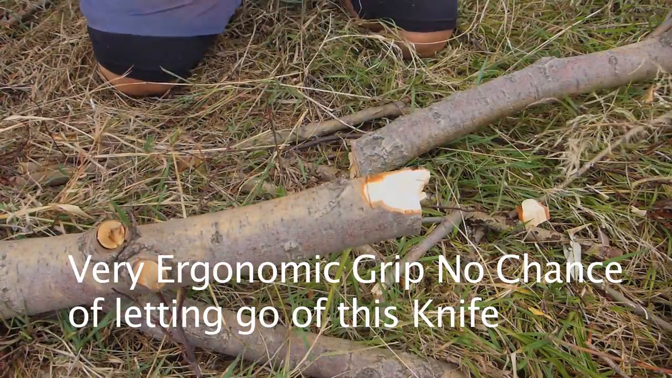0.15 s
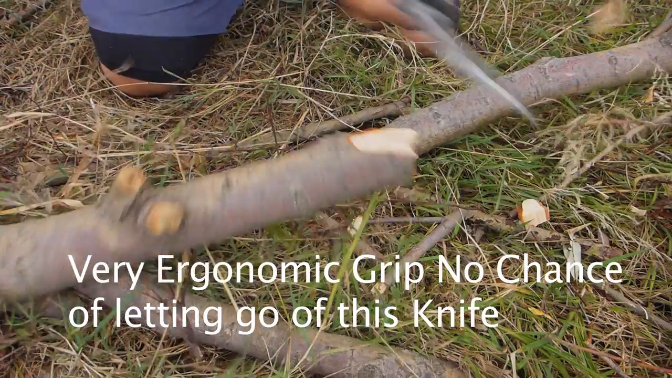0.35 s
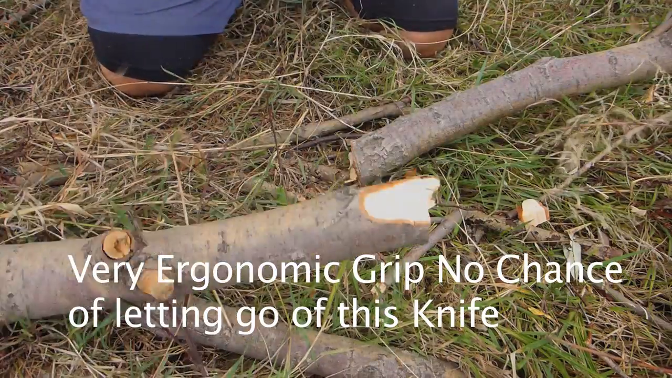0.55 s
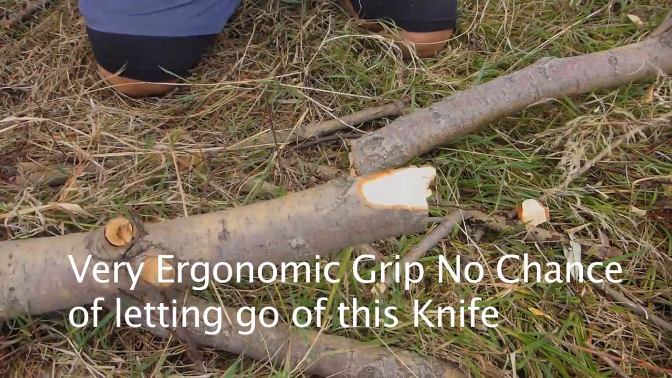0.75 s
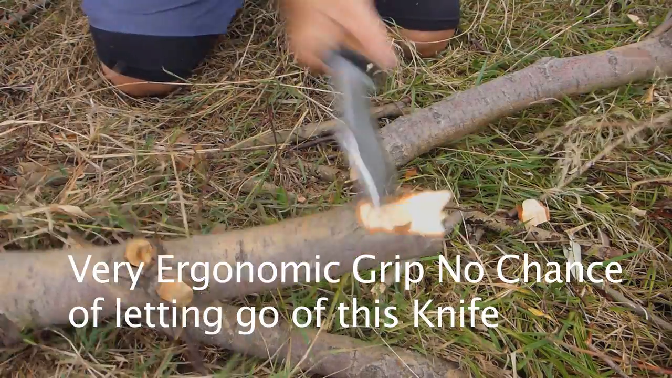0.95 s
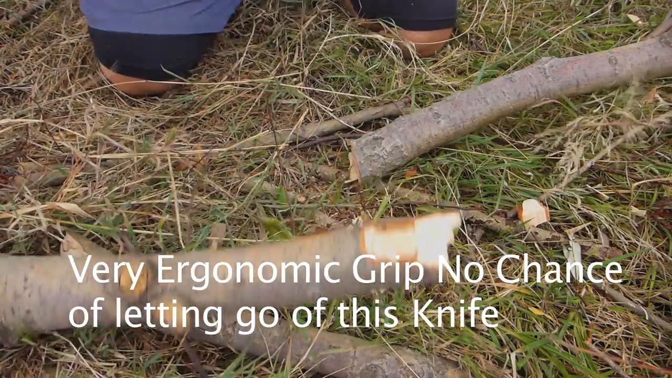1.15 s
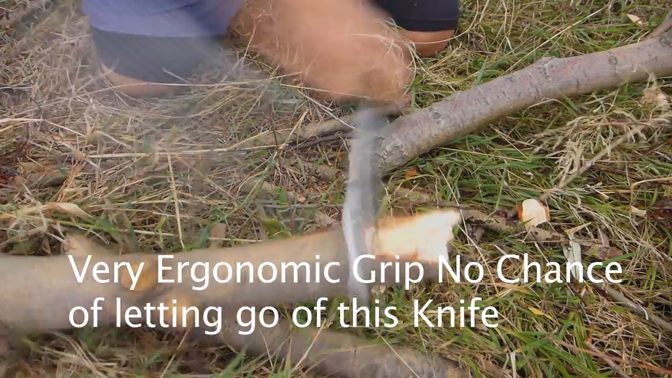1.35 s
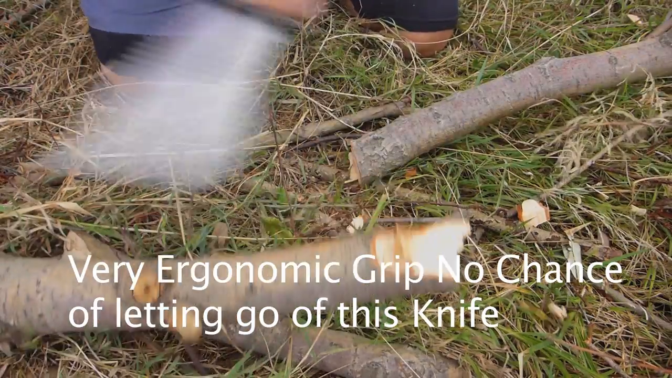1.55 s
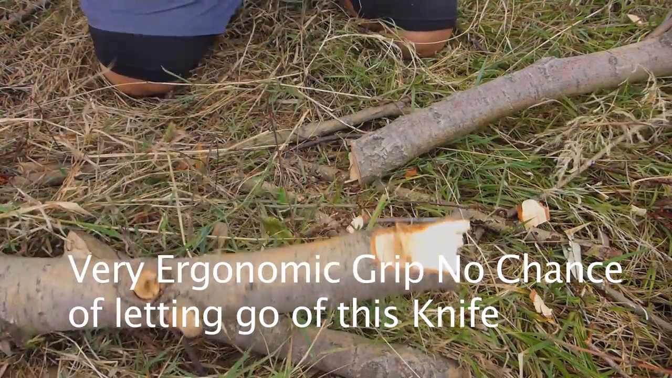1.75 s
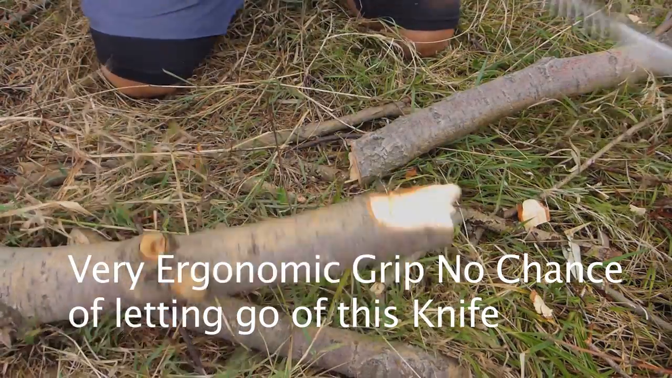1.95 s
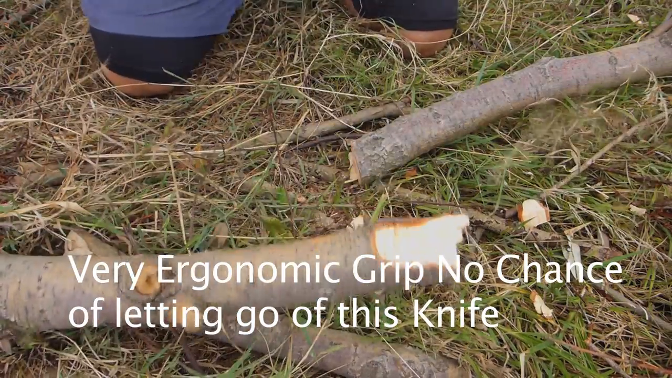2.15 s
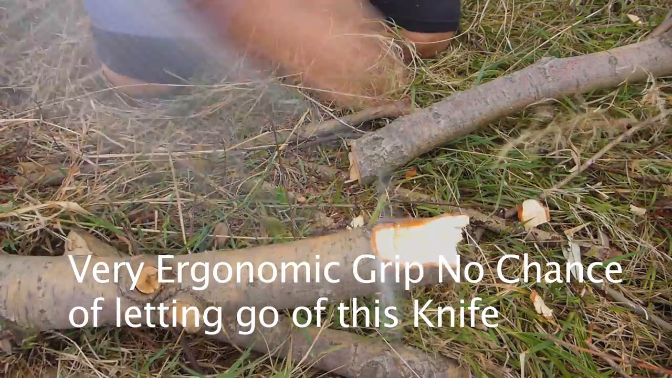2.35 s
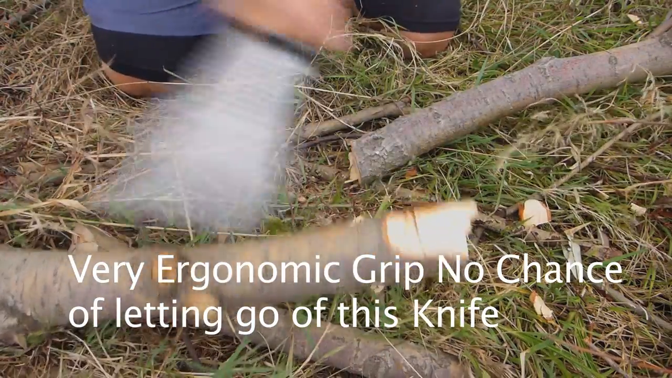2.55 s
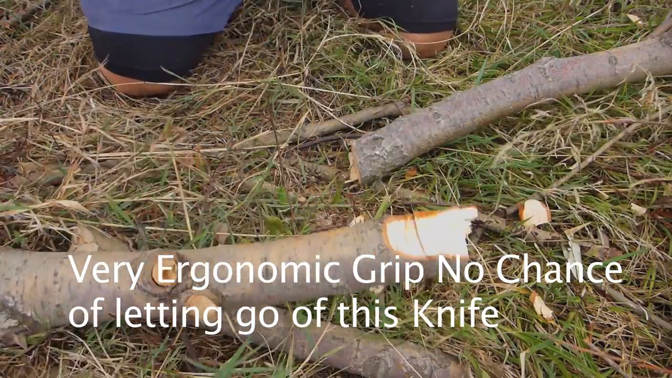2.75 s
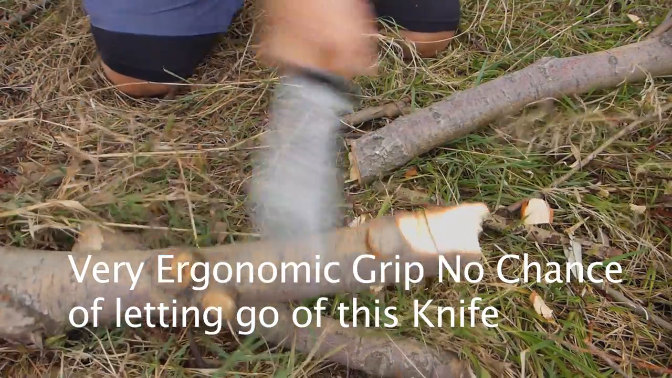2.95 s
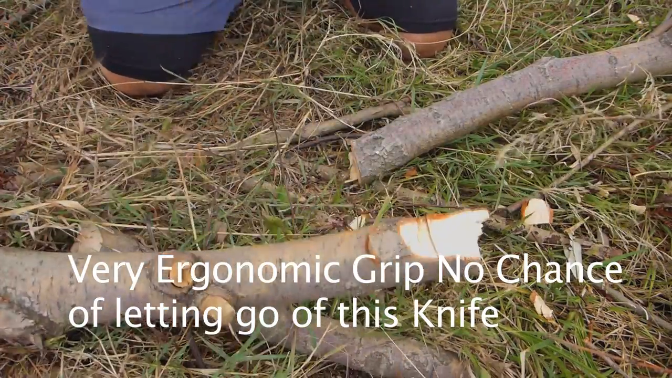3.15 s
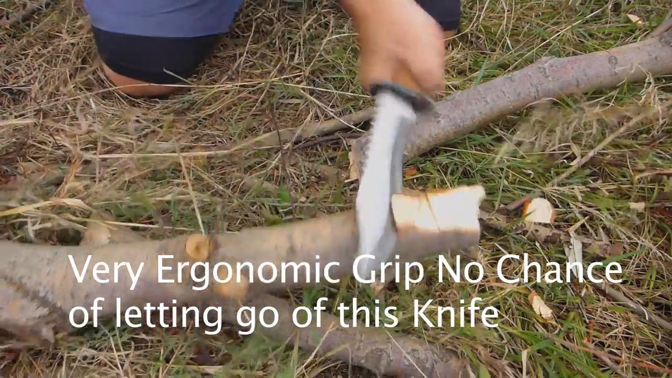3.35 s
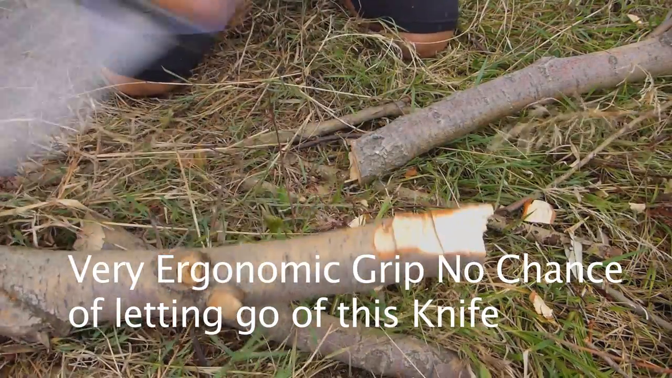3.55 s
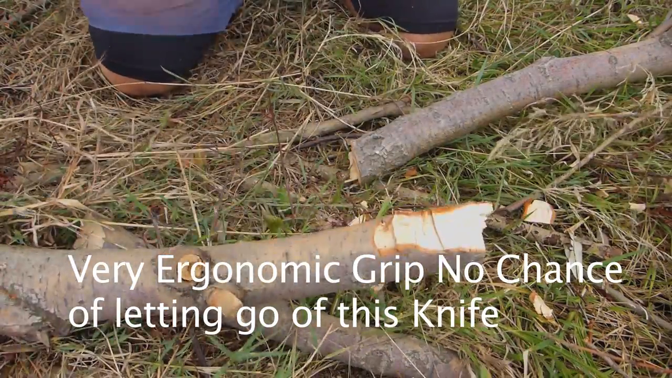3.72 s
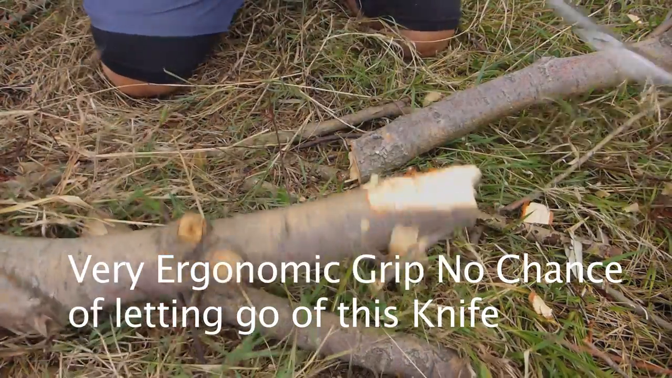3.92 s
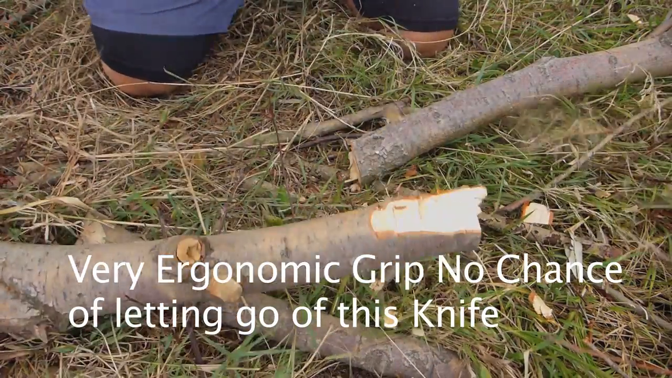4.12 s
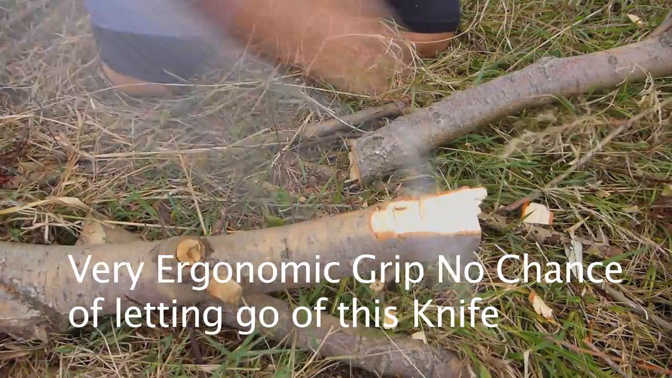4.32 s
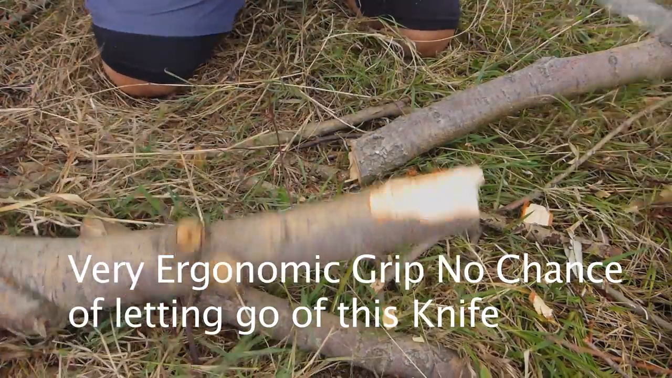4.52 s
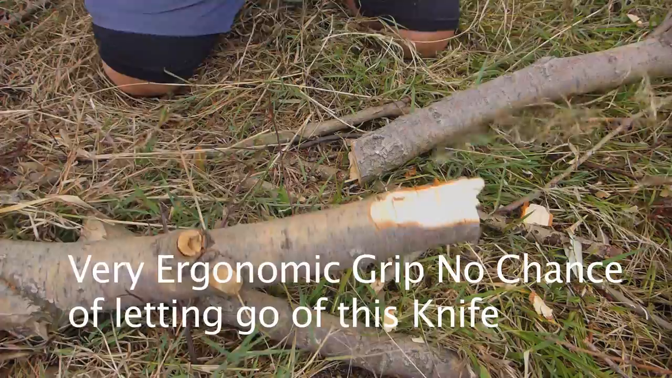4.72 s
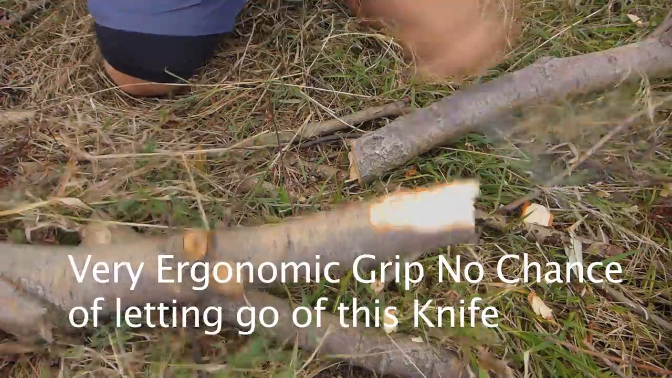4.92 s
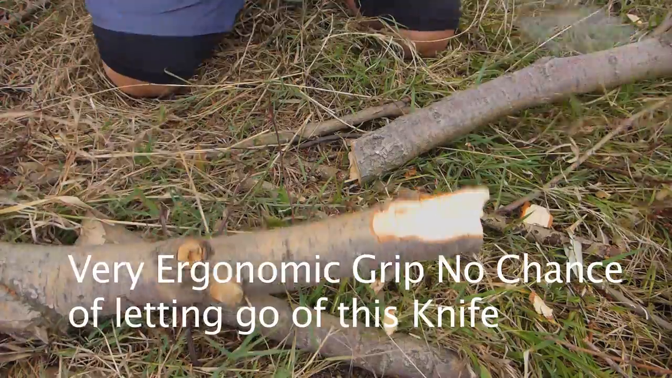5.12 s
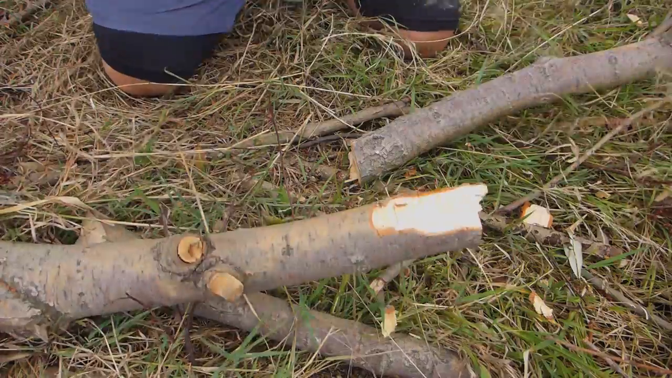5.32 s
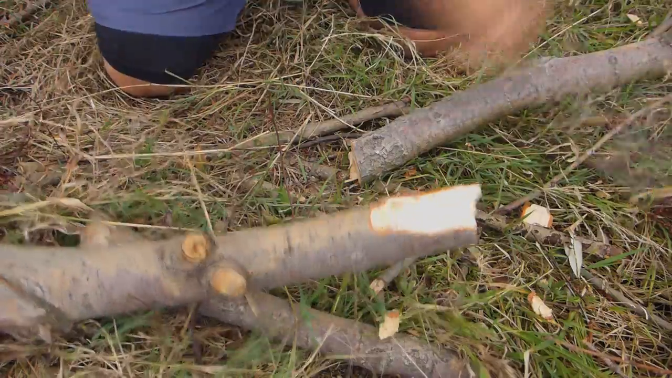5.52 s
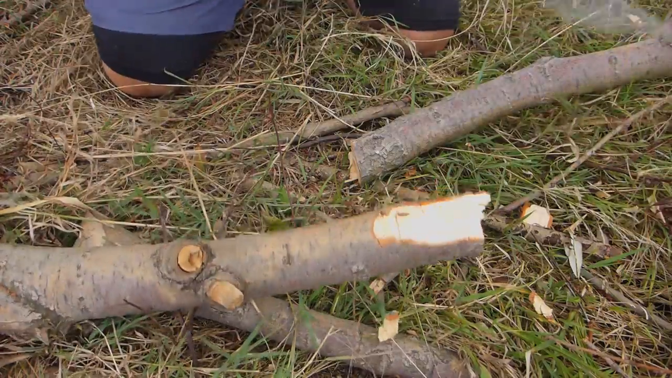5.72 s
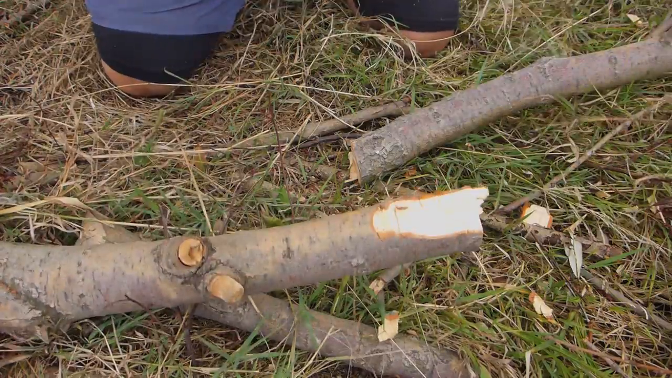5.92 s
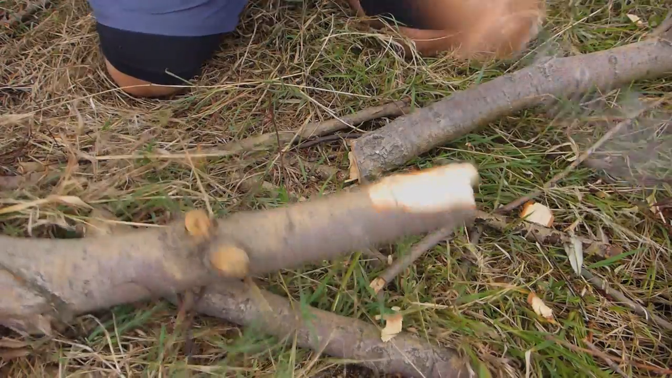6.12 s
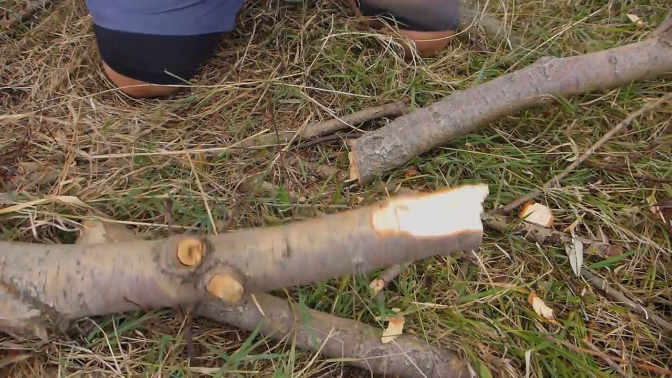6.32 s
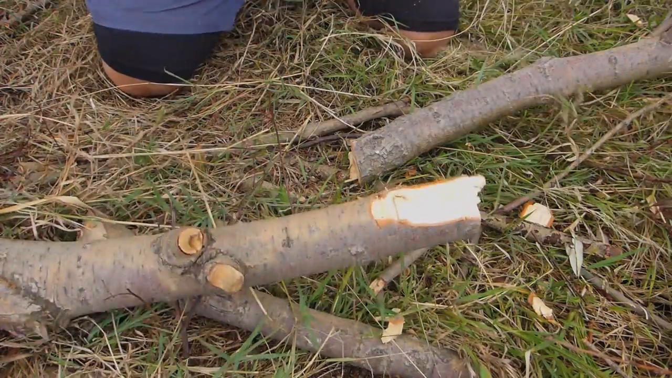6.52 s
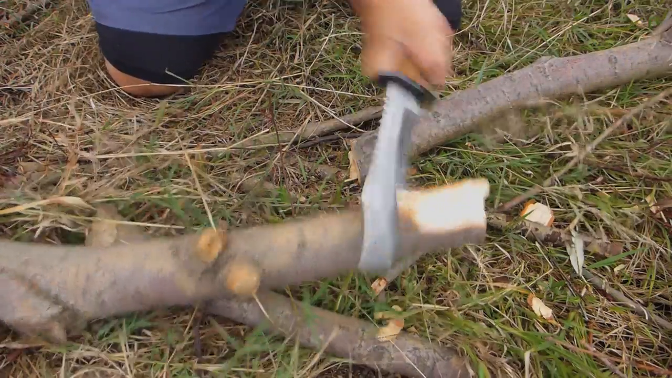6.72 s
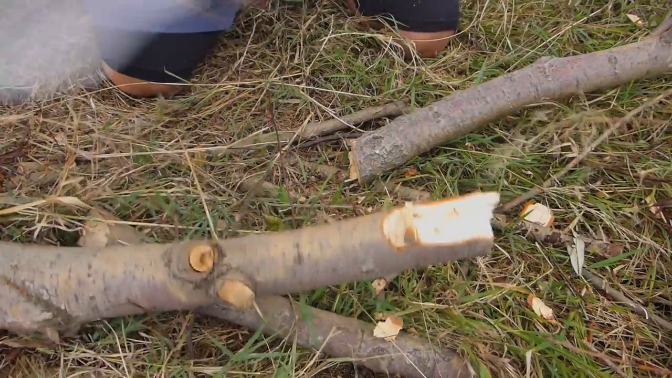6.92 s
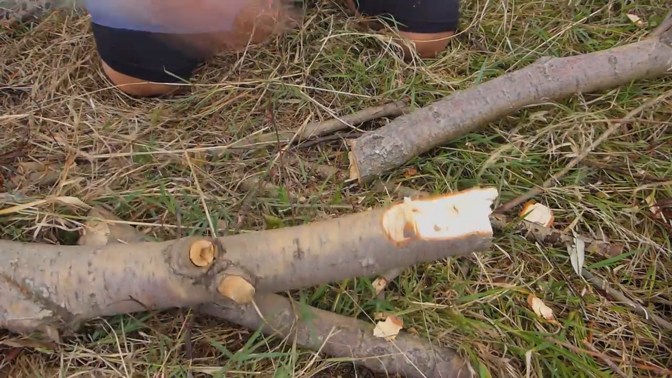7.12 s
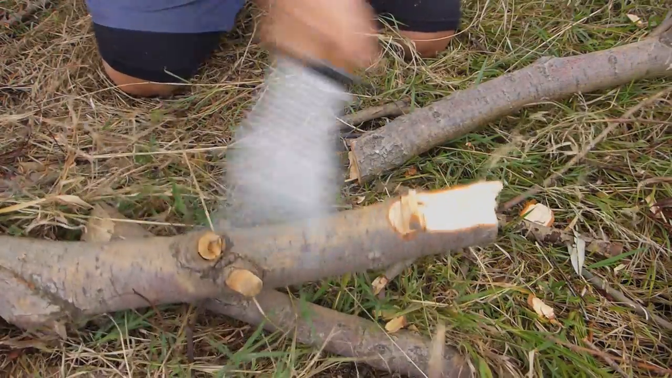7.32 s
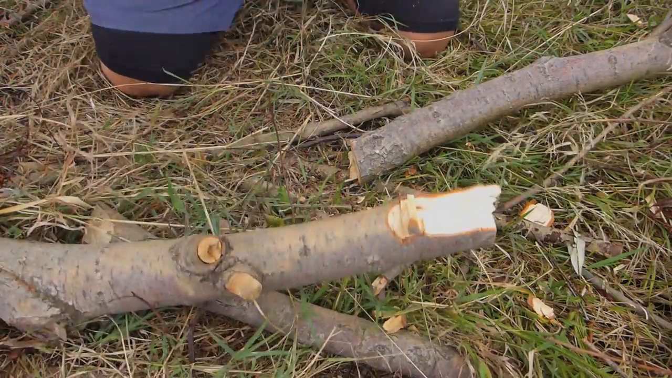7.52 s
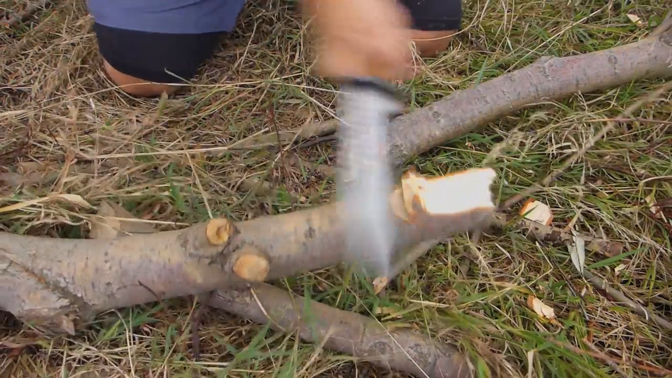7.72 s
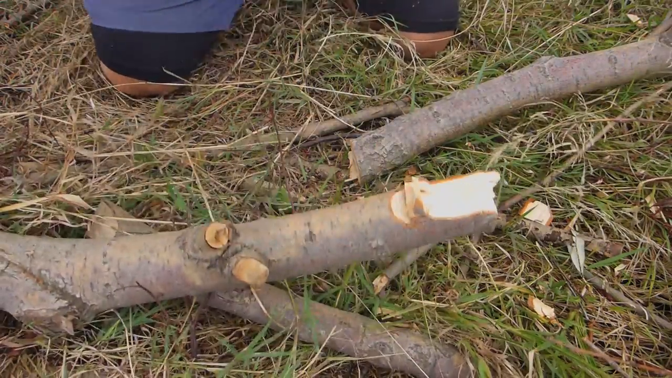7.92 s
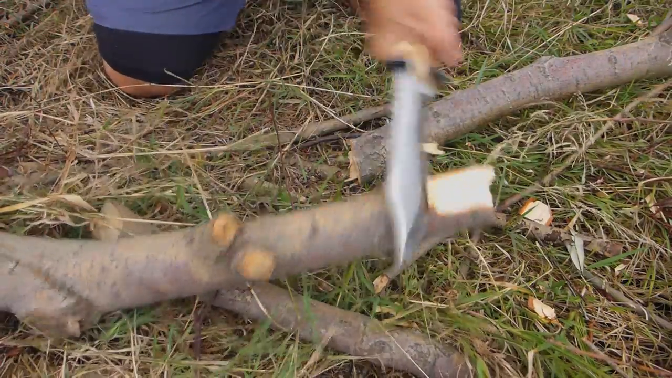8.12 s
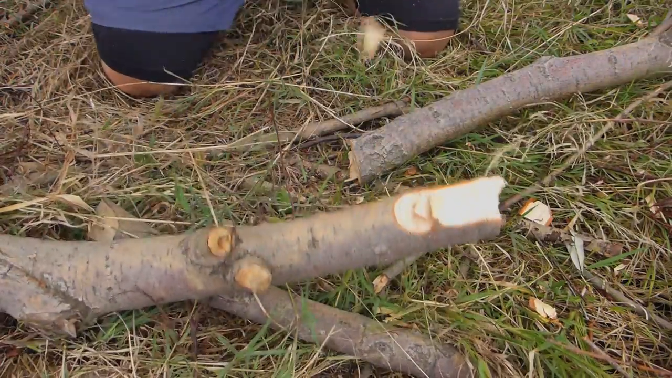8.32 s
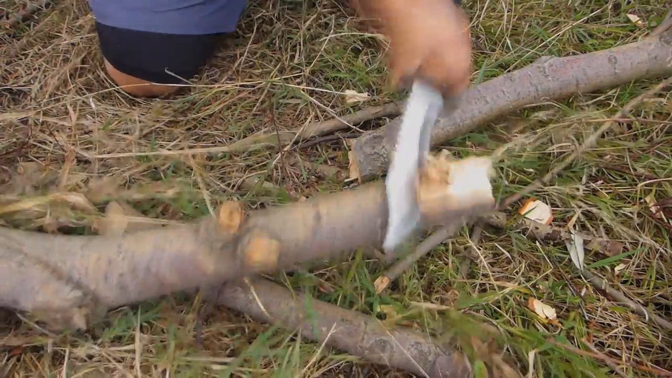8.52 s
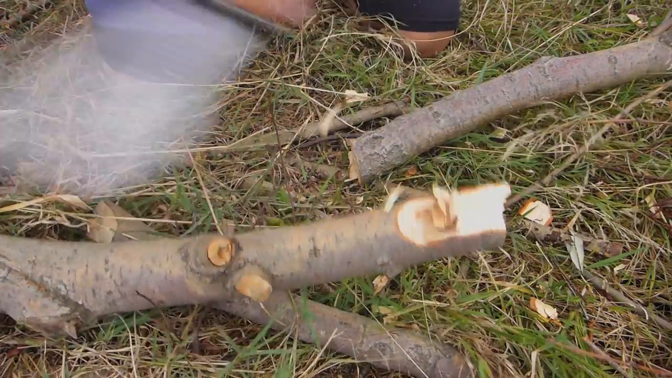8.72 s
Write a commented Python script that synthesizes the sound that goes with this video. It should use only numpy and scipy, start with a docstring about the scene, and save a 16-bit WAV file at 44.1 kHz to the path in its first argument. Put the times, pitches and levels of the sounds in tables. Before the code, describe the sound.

Outdoors, close to the microphone, a large blade strikes the end of a branch lying on grass seventeen times in an even rhythm. The hits are loud, short and woody, with snapping bark and splitting fibres, and the hardest ones overload slightly. In the gaps come tiny ticks of chips and a few soft bumps as the branch settles. A faint, far rush continues underneath.

```python
"""Chopping a green branch on grass.

A heavy knife strikes the branch end, close to a stereo microphone pair. Each blow cracks bark,
splits fibres and rings the branch's modes. Chips tick, the branch settles, shaken grass rustles.
A far, steady rush lies underneath. The loudest blows overload the input."""
import sys
import numpy as np
from scipy import signal
from scipy.fft import rfft, irfft, next_fast_len
from scipy.io import wavfile
from scipy.ndimage import uniform_filter1d

SR = 44100
rng = np.random.default_rng(int(sys.argv[2]) if len(sys.argv) > 2 else 0)


def store_pcm(level_fs):
    """Save levels as 16-bit WAV."""
    pcm = np.round(np.clip(level_fs, -1, 1) * 32767).astype(np.int16)
    wavfile.write(sys.argv[1], SR, np.atleast_2d(pcm).T)


N = 391166

# Noise spectra. Each row: frequency in Hz, relative density in dB.
RUSH_SPECTRUM = [(15, -24), (30, 0.5), (70, -7.5), (118, -1), (235, -3.5), (450, -2.5), (750, -6.5),
                 (1250, -7), (3050, -17.5), (5300, -23.5), (5900, -34), (8300, -32.5), (9000, -44),
                 (12000, -57.5)]  # far rush
GRASS_SPECTRUM = [(3240, -32.5), (5500, -9.5), (8300, -6), (8990, -11), (9960, 4.5), (11900, -1.5),
                  (14600, -11.5), (16000, -30)]  # stems springing back
EDGE_SPECTRUM = [(4000, -21.5), (7000, -6.5), (9000, -6), (10500, -4), (12500, -6), (14000, -18),
                 (16000, -29)]  # steel biting bark
CRACK_SPECTRUM = [(1200, -23.5), (2000, -4), (3200, 3), (4500, -1.2), (6000, -9.5), (7500, -24)]  # bark breaking
SPLIT_SPECTRUM = [(100, -22.5), (220, -6), (800, -3.5), (1500, -1.5), (2500, -5), (3500, -13),
                  (5000, -26.5), (9000, -58)]  # fibres tearing
SPRAY_SPECTRUM = [(1500, -22.5), (3000, 5.5), (5000, 1.5), (8000, -6.5), (9000, -11.5), (10500, -0.5),
                  (12500, -7.5), (14000, -25.5), (16000, -36.5)]  # chip spray
SCATTER_SPECTRUM = [(100, -34), (500, -20), (1000, 0), (1800, -1.5), (4000, -9), (8000, -30)]  # echo off stems and turf
# Far rush envelope. Each row: time in seconds, level in dB.
RUSH_LEVELS = [(0.0, -54), (6.57, -54), (6.67, -53), (7.53, -54.5), (7.81, -56.5), (8.15, -54.5),
               (8.87, -56.5)]
# Width of rush and grass. Each row: frequency in Hz, left-right correlation.
DIFFUSE_CORRELATION = [(60, 0.28), (290, 0.77), (640, 0.9), (1200, 0.042), (3100, 0.79), (6800, 0.49),
                       (15000, 0.18)]
# Balance of rush and grass. Each row: frequency in Hz, left minus right in dB.
DIFFUSE_PAN = [(60, 1.5), (110, -2.5), (200, 0), (380, 1), (700, 2.5), (1290, -2.5), (2380, -3.5),
               (4400, -1), (8120, 0.5), (15000, 1)]
# Branch settling on turf. Each row: start in seconds, level in dB, centre in Hz.
SETTLING_BUMPS = [(.428, -48, 806), (.984, -40, 339), (5.333, -43, 396), (6.186, -40, 452),
                  (6.369, -55, 517)]
# Late fibres, chips and twigs. Each row: start in seconds, body level in dB, top relative to body
# in dB, centre in Hz, pan in dB.
DEBRIS_TICKS = [(.258, -34.5, -6.5, 3500, 2.5), (.4006, -40, -30, 3180, 5), (0.5363, -39.5, -1, 2870, -8),
                (.8292, -45, -14, 3500, 2), (0.9072, -44, -21, 2380, 0), (0.9656, -48, -26, 3610, -3.5),
                (1.004, -45, -23, 2770, 8), (1.8531, -38.5, -13, 3500, 0), (2.3928, -23, -37, 2340, -1),
                (2.4515, -46, -9, 3820, 1), (2.902, -44, -16, 3500, 6), (2.94, -42.5, -1, 3200, 4),
                (2.959, -48.5, -5, 3550, -1.5), (3.3633, -32, -23.5, 3280, -0.5),
                (3.3734, -41.5, -15.5, 3460, 2), (3.445, -50.5, -15, 3330, -15),
                (3.8247, -22, -21.5, 2923, 0), (3.8382, -43, -15, 3500, 0), (3.9085, -47.5, -9, 3450, -12),
                (4.7663, -43.5, -18, 2790, -8), (4.812, -50, -20, 4370, -2), (4.8973, -45, -23, 3270, -3),
                (4.9754, -37.5, -25, 2380, -11), (6.7004, -35, -26, 2270, -3),
                (6.7052, -39.5, -15.5, 3470, -3.5), (6.7105, -38, -14, 3440, 2.5),
                (6.762, -43.5, -4, 2980, -11), (6.765, -41, -3, 2980, -.5), (6.963, -38, -5, 4130, 7),
                (7.217, -38.5, -2, 3990, 1), (7.226, -42, -15, 3500, 2), (7.677, -44, -25, 2260, 4.5),
                (7.9062, -27.5, -7, 4330, -6.5), (7.9423, -45, -3, 3600, -12), (7.9546, -44, -2, 3580, 7),
                (7.9832, -43, -29, 2260, -8), (8.2907, -43.5, -30, 4640, -1), (8.419, -51, 1, 3200, -5),
                (8.645, -41.5, 0, 2900, -7), (8.845, -45.5, -31, 2220, -9)]
# Splitting decay. Each row: frequency in Hz, base T60 in seconds.
SPLIT_DECAY = [(100, 0.13), (500, 0.27), (1500, 0.11), (3500, 0.077), (8000, 0.027)]
# Branch modes. Each row: frequency in Hz, level within its group in dB, base T60 in seconds.
BRANCH_MODES = [(118, -5, .5), (210, 0, .58), (251, 1, .4), (335, 2, .29), (353, -1, .29), (445, -10, .24),
                (495, -5.5, .23), (522, -4.5, .2), (588.4, -2.5, .2), (640, -5, .08), (699.7, 1.5, .15),
                (795, -10.5, .22), (831.2, -5, .19), (950, -7, .085), (1002, -1.5, .15), (1124.6, -4, .11),
                (1175, -3.5, .11), (1385, 0, .06), (1590, -2, .065), (1850, 2, .065), (2290, 1, .06),
                (2640, -4, .055), (3100, -6, .05)]
# Paths to the microphones; the branch runs off to the left. Each row: frequency in Hz, the cut's
# left minus right in dB and left lead in radians, then the same two for the branch.
MIC_PATHS = [(60, .1, .01, .2, .03), (220, -.8, .08, .6, .07), (420, .2, .01, 2.2, .02),
             (720, .4, -.16, 4.2, .03), (1080, -.6, .04, 7, -.34), (1600, -.8, -.5, 4.6, -.77),
             (2500, -2.6, .24, .9, -.33), (4200, -.8, .9, .1, -.04), (6400, 3.5, .9, .3, .3),
             (9800, -4, .7, -1.5, .3), (15000, -4.5, 0.9, -2.5, .3)]
# Knife blows. Each row: start in seconds, knock in dB and Hz, snap in dB and Hz, levels in dB of crack,
# edge, split, spray and grass, levels in dB of the deep, low, middle and high modes, favoured mode
# in Hz, damping factor, pan in dB.
KNIFE_BLOWS = [(0.2335, -3, 475, -1.5, 3080, -10, -9.5, -19.5, -50, -69.5, -40, -36.5, -21.5, -27, 1002.0, 1.045, 0.16),
               (0.8042, 1.5, 620, -5, 2070, -6.5, -16.5, -17, -53.5, -75, -34.0, -29, -20.5, -34, 522.0, 1.64, 0.4),
               (1.3495, 3.5, 752, -10.5, 1340, -10, -16.5, -16, -54, -70, -32, -31, -17.5, -21.5, 831.2, 1.94, 0.56),
               (1.8381, 8.5, 631.5, -1.5, 1950, -3.5, -11.5, -22, -54.5, -71.5, -35.5, -42, -19, -27.5, 1124.6, 1.6, 0.2),
               (2.3702, -1, 680, -1, 2880.0, -21.5, -12.5, -10, -51, -91, -32, -29, -17, -20, 1002.0, 4.36, 0.98),
               (2.8633, -4, 1086, -2, 1674, -5.5, -21.5, -10.5, -49, -73, -31.0, -19, -19.0, -39, 522.0, 2.52, -0.035),
               (3.3406, -2.5, 683, -44.5, 3380, -5.5, -9.0, -18, -56.5, -65.5, -45.5, -40.5, -22.5, -32.5, 699.7, 2.2, 0.57),
               (3.8104, -6.5, 491, -22, 2700.0, -2, -9, -21, -54, -82, -32.5, -30.5, -16, -20.5, 588.4, 1.13, 0.5),
               (4.3664, -1.5, 670.0, -3.5, 2710, -7, -13.5, -28, -59, -70, -36, -34.5, -22, -22, 795.0, 1.08, 0.28),
               (4.918, 4.5, 720.0, 1.5, 3030, -9, -16.5, -24.0, -60.5, -67.5, -37, -24.5, -18, -26, 588.4, 1.265, 0.19),
               (5.5021, 7.5, 535, 0, 2330, -4, -21, -33.5, -67, -84, -34.5, -31.5, -15.5, -16, 588.4, 1.24, 1.2),
               (6.0817, 4, 648, -0.5, 2480, -10.5, -14.0, -33.5, -57.5, -68, -34, -37, -17.5, -26.5, 588.4, 1.13, 1.1),
               (6.676, 1, 540, -3.5, 1810, -5, -11.5, -17.0, -48.5, -66, -33.5, -34, -21, -28.0, 522.0, 1.28, 0.45),
               (7.1963, 0, 652, -2.5, 1600, -5.5, -17, -27, -51, -80, -29.5, -26.5, -17.5, -21, 1002.0, 2.8, 0.83),
               (7.6426, 1, 549, -0.5, 1950, -2, -22.5, -23, -53, -74.5, -43.5, -34.5, -28.5, -32, 495.0, 2.4, -0.39),
               (8.0679, -8.5, 800, -10, 3310, -5, -13, -18, -48.5, -71, -36.5, -32.0, -21.0, -29, 699.7, 1.8, 0.73),
               (8.5215, 1, 641, 0, 1930, -3, -9, -21.5, -47, -83, -42.5, -36, -21.5, -24, 1002.0, 4, -0.79)]

GRASS_REST_DB, GRASS_RISE_S, GRASS_T60_S = -82, 0.06, 1.8
BUMP_T60_S, TICK_T60_S = 0.059, 0.0065
CRUMBS_PER_BLOW, CRUMB_FLIGHT_S, CRUMB_DB = 2, 0.1, -56
DEEP_TOP_HZ, LOW_TOP_HZ, MIDDLE_TOP_HZ = 300, 400, 1300  # mode groups
FAVOUR_DB, FREE_RING_S, UPPER_DAMPING_SHARE = 2.5, 0.036, 0.65
MODE_WIDTH_HZ, HIGH_WIDTH_HZ, SNAP_WIDTH_HZ = 0.78, 69, 200
EDGE_LEAD_S, SPRAY_RISE_S = 0.00023, 0.0033
CLIP_LEVEL, BASS_HZ, DULL_HZ, DULL_DB_PER_KHZ, TOP_HZ = 0.97, 70, 11200, 2, 16550


def amp(db):
    return 10 ** (np.asarray(db) / 20)


def unit_rms(x):
    return x / np.sqrt(np.mean(x ** 2) + 1e-20)


def rise(t, rise_s, power=1):
    return 1 - np.exp(-(t / rise_s) ** power)


def decay(t, db, t60_s):
    return amp(db - 60 * t / t60_s)


def lookup(table, hz, col=1):
    """Interpolate a column over log frequency."""
    columns = np.transpose(table)
    return np.interp(np.log(hz + 1), np.log(columns[0] + 1), columns[col])


def filtered(x, response):
    """Apply a complex frequency response."""
    n = x.shape[-1]
    padded = next_fast_len(n + 8192)
    return irfft(rfft(x, padded) * response(np.fft.rfftfreq(padded, 1 / SR)), padded)[..., :n]


def noise(spectrum, count, clumps=1):
    """Coloured noise, rms 1, optionally clumped."""
    return unit_rms(filtered(clumps * rng.standard_normal(count), lambda hz: amp(lookup(spectrum, hz))))


def crackle(count, depth_db, grain_samples):
    """Uneven gain, rms 1: small breaks come in clumps."""
    wander = unit_rms(uniform_filter1d(rng.standard_normal(count), grain_samples))
    return unit_rms(amp(depth_db * wander))


def phase_drift(width_hz, count):
    """Smooth random walk of phase; widens each line."""
    steps = rng.standard_normal((len(width_hz), count))
    steps = uniform_filter1d(uniform_filter1d(steps, 32), 32)
    return np.sqrt(2 * np.pi * np.abs(width_hz) / SR) * np.cumsum(steps, axis=1)


def add(track, start_s, sound, pan_db):
    """Mix in a mono or stereo sound; positive pan is left."""
    part = track[:, round(start_s * SR):][:, :sound.shape[-1]]
    part += sound[..., :part.shape[1]] * amp([[pan_db / 2], [-pan_db / 2]])


def at_mics(track, col):
    """Give each microphone half the level and phase difference."""
    def response(hz):
        log_ratio = lookup(MIC_PATHS, hz, col) * np.log(10) / 20 + 1j * lookup(MIC_PATHS, hz, col + 1)
        return np.exp(np.outer([.5, -.5], log_ratio))
    return filtered(track, response)


def diffuse_noise(spectrum, patchy_db):
    """Partly correlated stereo noise, rms 1, with random gain patches in time and frequency."""
    def mid_side(hz):
        angle = np.arccos(np.clip(lookup(DIFFUSE_CORRELATION, hz), -1, 1)) / 2
        return amp(lookup(spectrum, hz)) * [np.cos(angle), np.sin(angle)]
    bins = signal.stft(rng.standard_normal((2, N)), nperseg=512)[2]
    patches = uniform_filter1d(uniform_filter1d(rng.standard_normal(bins.shape[1:]), 6, 0), 10, 1)
    pair = signal.istft(bins * amp(patchy_db * unit_rms(patches)), nperseg=512)[1][:, :N]
    mid, side = filtered(pair, mid_side)
    stereo = np.array([mid + side, mid - side])
    return unit_rms(filtered(stereo, lambda hz: amp(np.outer([.5, -.5], lookup(DIFFUSE_PAN, hz)))))


def far_rush():
    """Distant broadband noise, nearly steady."""
    level_db = np.interp(np.arange(N) / SR, *np.transpose(RUSH_LEVELS))
    return amp(level_db) * diffuse_noise(RUSH_SPECTRUM, patchy_db=-0.13)


def grass():
    """Stems crackle as they spring back after each blow."""
    t = np.arange(N) / SR
    clumps = crackle(N, depth_db=3, grain_samples=120)
    stems = unit_rms(clumps * diffuse_noise(GRASS_SPECTRUM, patchy_db=1.5))
    envelope = amp(GRASS_REST_DB)
    for blow in KNIFE_BLOWS:
        start_s, grass_db = blow[0], blow[9]
        age_s = np.maximum(t - start_s, 0)
        swell = rise(age_s, GRASS_RISE_S, power=2) * decay(age_s, grass_db, GRASS_T60_S)
        envelope = np.hypot(envelope, swell)
    return envelope * stems


def settling():
    """The branch settles on the turf in soft, dull bumps."""
    track, t = np.zeros((2, N)), np.arange(4096) / SR
    for start_s, db, hz in SETTLING_BUMPS:
        spectrum = [(.3 * hz, -25), (.7 * hz, -4), (hz, 0), (1.6 * hz, -7), (4 * hz, -35), (8 * hz, -90)]
        add(track, start_s, rise(t, .0013) * decay(t, db, BUMP_T60_S) * noise(spectrum, len(t)), pan_db=4)
    return track


def debris():
    """Fibres, chips and twigs tick: woody body, brittle top. Faint crumbs follow each blow."""
    track, t = np.zeros((2, N)), np.arange(2048) / SR
    crumbs = [(blow[0] + rng.exponential(CRUMB_FLIGHT_S), rng.normal(CRUMB_DB, 3.7),
               rng.normal(-19, 5), rng.uniform(2200, 3800), rng.normal(-2, 3))
              for blow in KNIFE_BLOWS for _ in range(CRUMBS_PER_BLOW)]
    for start_s, db, top_db, hz, pan_db in DEBRIS_TICKS + crumbs:
        spectrum = [(.35 * hz, -24), (.7 * hz, -5), (hz, 0), (1.5 * hz, -6), (3 * hz, -26), (6 * hz, -70)]
        body = noise(spectrum, len(t))
        top = amp(top_db) * noise(EDGE_SPECTRUM, len(t))
        add(track, start_s, rise(t, .000083) * decay(t, db, TICK_T60_S) * (body + top), pan_db)
    return track


def chip_spray(t, db):
    """Fine chips fly off in a grainy hiss."""
    clumps = crackle(len(t), depth_db=2, grain_samples=65)
    return rise(t, SPRAY_RISE_S, power=2) * decay(t, db, .27) * noise(SPRAY_SPECTRUM, len(t), clumps)


def splitting(t, damping):
    """Fibres tear: steady coloured noise, each band with its own decay."""
    tearing = noise(SPLIT_SPECTRUM, len(t), crackle(len(t), depth_db=0, grain_samples=170))
    hz, frame_s, bins = signal.stft(tearing, SR, nperseg=128)
    t60_s = lookup(SPLIT_DECAY, hz)[:, None] / damping
    return signal.istft(bins * decay(frame_s, 0, t60_s), SR, nperseg=128)[1][:len(t)]


def branch_ring(t, group_db, favoured_hz, damping):
    """The branch jumps and rings freely, then turf or the stuck blade damps it."""
    hz, mode_db, t60_s = np.transpose(BRANCH_MODES)[..., None]
    group = np.searchsorted([DEEP_TOP_HZ, LOW_TOP_HZ, MIDDLE_TOP_HZ], hz)
    lift_db = FAVOUR_DB * (hz == hz[np.abs(hz - favoured_hz).argmin()])
    level_db = mode_db + np.take(group_db, group) + lift_db + rng.normal(0, 2.3, hz.shape)
    extra_damping = np.where(hz < LOW_TOP_HZ, 1, UPPER_DAMPING_SHARE) * (damping - 1)
    decay_time_s = t + extra_damping * np.maximum(t - FREE_RING_S, 0)
    rock_cycles = rng.uniform(11, 22, hz.shape) * t + rng.random(hz.shape)  # rocking on the grass
    rock_db = np.where(hz < DEEP_TOP_HZ, 5, 2.5) * np.sin(2 * np.pi * rock_cycles)
    detuned_hz = hz * rng.normal(1, np.where(hz < MIDDLE_TOP_HZ, .004, .02))
    phase = 2 * np.pi * (detuned_hz * t + rng.random(hz.shape))
    phase += phase_drift(np.where(hz < MIDDLE_TOP_HZ, MODE_WIDTH_HZ, HIGH_WIDTH_HZ), len(t))
    return np.sum(decay(decay_time_s, level_db + rock_db, t60_s) * np.sin(phase), axis=0)


def blade_contact(t, knock_db, knock_hz, snap_db, snap_hz, crack_db):
    """The blade snaps two stiff modes of the cut end, breaks bark and stops with a dull knock."""
    phase = 2 * np.pi * np.outer([snap_hz, rng.uniform(1500, 3200)], t)
    modes = np.sin(phase + phase_drift([[SNAP_WIDTH_HZ]] * 2, len(t)))
    snap = -rise(t, .0001) * decay(t, snap_db, .007) * (modes[0] + amp(-3) * modes[1])
    shove_hz = rng.normal(300, 30)  # end driven into the turf
    shove = decay(t, knock_db - 30.5, .035) * np.sin(2 * np.pi * shove_hz * t)
    knock_age_s = np.maximum(t - .0003, 0)
    knock = decay(knock_age_s, knock_db, .0085) * np.sin(2 * np.pi * knock_hz * knock_age_s)
    bark = noise(CRACK_SPECTRUM, len(t), crackle(len(t), depth_db=6.5, grain_samples=33))
    crack = rise(t, .00034) * decay(t, crack_db, .014) * bark
    return snap + knock + shove + crack


def chops():
    """Each blow lands on a new spot and drives the mode groups at new strengths."""
    cut, branch, t = np.zeros((2, N)), np.zeros((2, N)), np.arange(18000) / SR
    for (start_s, knock_db, knock_hz, snap_db, snap_hz, crack_db, edge_db, split_db, spray_db, _,
         *group_db, favoured_hz, damping, pan_db) in KNIFE_BLOWS:
        bite = rise(t, .00053) * decay(t, edge_db, .01) * noise(EDGE_SPECTRUM, len(t))
        add(cut, start_s - EDGE_LEAD_S, bite, pan_db)
        spray = chip_spray(t, spray_db)
        contact = blade_contact(t, knock_db, knock_hz, snap_db, snap_hz, crack_db)
        add(cut, start_s, contact + spray, pan_db)
        split = amp(split_db) * splitting(t, 1 + UPPER_DAMPING_SHARE * (damping - 1))
        ring = branch_ring(t, group_db, favoured_hz, damping)
        add(branch, start_s, rise(t, .0011) * (ring + split), pan_db)  # bending wave fills the branch
        echo = rise(t, .00097, power=2) * decay(t, snap_db - 14, .021) * noise(SCATTER_SPECTRUM, len(t))
        add(cut, start_s, np.outer([1, -1], echo), pan_db=0)  # antiphase
    return at_mics(cut, col=1) + at_mics(branch, col=3)


def scene():
    return chops() + debris() + settling() + far_rush() + grass()


def record(dry):
    """Soft overload, bass and treble roll-off, hard clip, band limit."""
    def roll_off(hz):
        highpass = (1j * hz / (BASS_HZ + 1j * hz)) ** 3
        return highpass * amp(-DULL_DB_PER_KHZ * np.maximum(hz - DULL_HZ, 0) / 1000)
    saturated = dry / (1 + np.abs(dry / CLIP_LEVEL) ** 8) ** (1 / 8)
    clipped = np.clip(filtered(saturated, roll_off), -CLIP_LEVEL, CLIP_LEVEL)
    return filtered(clipped, lambda hz: np.clip((TOP_HZ - hz) / 200, 0, 1))


dry = scene()
out = record(dry)
store_pcm(out)
```